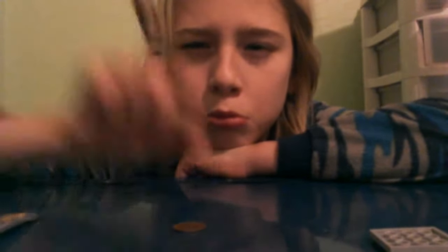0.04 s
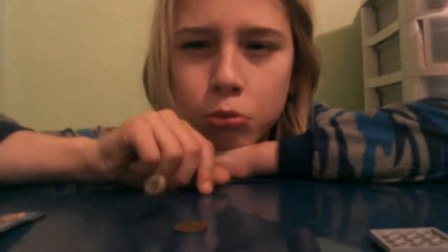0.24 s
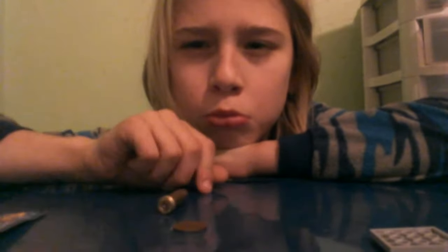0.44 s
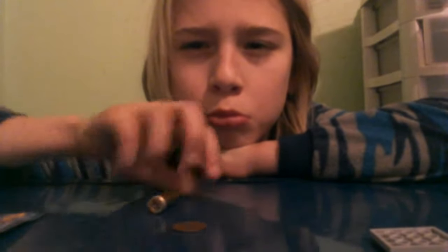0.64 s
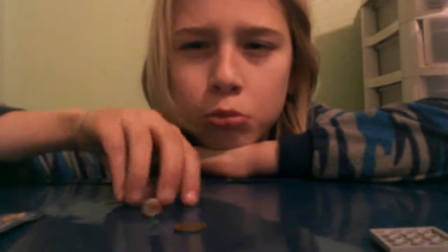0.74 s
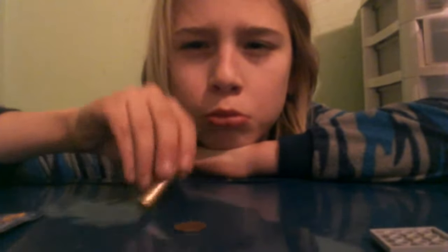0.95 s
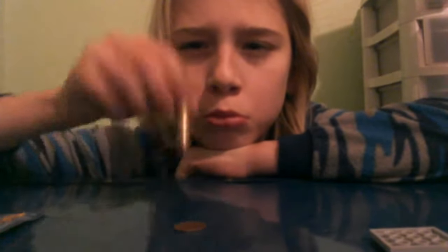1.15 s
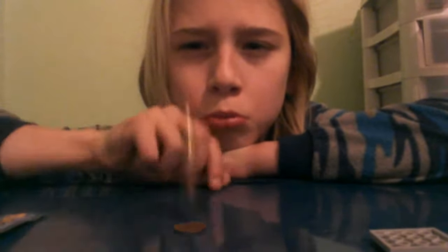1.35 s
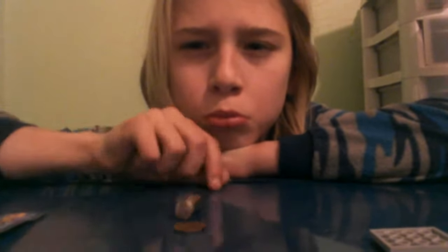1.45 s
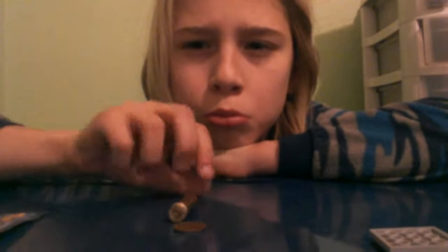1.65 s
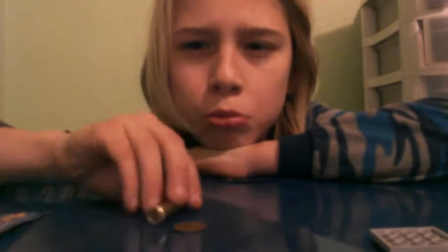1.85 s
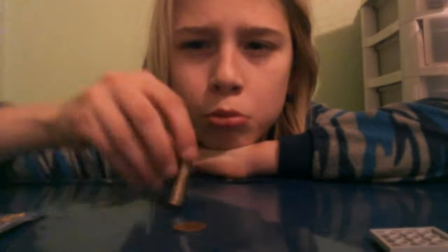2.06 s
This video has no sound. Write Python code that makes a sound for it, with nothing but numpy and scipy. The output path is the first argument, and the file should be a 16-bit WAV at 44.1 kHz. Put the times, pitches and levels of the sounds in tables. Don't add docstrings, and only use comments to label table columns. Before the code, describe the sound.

Light finger ticks and a hollow pop, then loud metal clacks with a table thump; quiet scraping and fumbling follow, then a second clattering landing and faint handling, close up in a small room with hiss.

```python
import sys
import numpy as np
from scipy import signal
from scipy.fft import rfft, irfft, next_fast_len
from scipy.io import wavfile
from scipy.ndimage import uniform_filter1d, map_coordinates

SR = 44100
rng = np.random.default_rng(int(sys.argv[2]) if len(sys.argv) > 2 else 0)


def inscribe(sig):
    pcm = np.round(np.clip(np.atleast_2d(sig).T, -1, 1) * 32767)
    wavfile.write(sys.argv[1], SR, pcm.astype(np.int16))


def gain_from_decibels(decibels):
    exponent = np.asarray(decibels, float) / 20
    return 10 ** exponent


N = 92610
T = np.arange(SR // 4) / SR

# start in seconds, crack in dB, table boom in dB, treble in dB, left-right in dB.
BOUNCES = [(0.2695, 4, -3, 1, -4.5), (0.2791, -5, -31, -1.5, 10), (0.2886, -5, -35.5, 3.5, 6),
           (0.315, -21.5, -35.5, 1, -1), (0.3868, -2, -12.5, 6, 6), (0.4021, -14.5, -30, 2.5, 8),
           (.426, -29, -24.5, 1.5, -11), (.448, -41, -28, -6, -1), (.472, -58.5, -33, -8, 3),
           (1.4686, 3, -7.5, 0, 13), (1.4786, -10, -28.5, -13.5, 3.5), (1.5063, -25, -36, -7.5, 10),
           (1.5564, -5.5, -10.5, -6.5, -1.5), (1.568, -22.5, -27, -10, 4.5)]
# frequency in Hz, density in dB per Hz.
CRACK = [(180, -42), (500, -16.5), (1370, 3), (2030, 3), (3390, -5.5), (4300, -6.5), (6560, -31.5),
         (12300, -26), (15500, -40.5)]
# frequency in Hz, level in dB, t60 in seconds.
TABLE_MODES = [(75.6, -25, 0.12), (101.85, -16.5, 0.14), (229.5, -10, .16), (394.1, 2.5, 0.083),
               (603.5, -10.5, .1), (699, -9.5, 0.1), (921, -10, 0.08), (1146, -15, 0.074),
               (1480, -9.5, .08), (1700, -15, 0.1), (1726, -11.5, 0.11), (2120, -5, .04),
               (2600, -20, 0.074), (3056, -8, 0.094)]


def bounces(track):
    crack_t60_s, treble_hz = 0.018, 5200
    for s, crack_db, boom_db, treble_db, pan_db in BOUNCES:
        spectrum = [(hz, db + treble_db * (hz > treble_hz)) for hz, db in CRACK]
        crack = gain_from_decibels(crack_db) * burst(spectrum, crack_t60_s)
        add_blow(track, s, crack, gain_from_decibels(boom_db) * ring(TABLE_MODES), pan_db)


# start in seconds, level in dB, pitch in Hz,
# t60 in seconds, left-right in dB.
CLACKS = [(0.1246, -28, 1480, .03, 7), (0.2067, -16.5, 1800, 0.022, -12.5), (.2694, -6.5, 1927, 0.027, 3),
          (0.271, -4, 960, 0.07, 2), (0.2695, -10.5, 4000, .015, 2.5), (0.3879, -12.5, 1643, 0.026, 6.5),
          (0.3864, -7.5, 905, 0.035, 2.5), (.389, -10, 579.3, 0.052, 3.5), (1.3264, -28.5, 1534, .04, 5),
          (1.3573, -23, 3850, 0.023, 5), (1.36, -20.5, 234.5, .13, 0.5), (1.4249, -24.5, 718, 0.026, 0),
          (1.4679, -6.5, 3265, 0.024, 8), (1.4689, -7.5, 1812, 0.027, 7.5), (1.5559, -3, 2120, 0.021, -2.5),
          (1.5567, -9.5, 4182, .018, -2.5), (1.5958, -5.5, 915, 0.01, -1),
          (1.5957, -15.5, 1380, 0.0085, -5), (1.5, -61, 14350, .3, 1)]


def clacks(track):
    for s, db, hz, t60_s, pan_db in CLACKS:
        place(track, s, panned(ring([(hz, db, t60_s)], attack_s=0.00015), pan_db))


# frequency in Hz, level in dB, t60 in seconds.
BRASS_MODES = [(12200, -14, .3), (12255, -7, .35), (12330, -14, .3), (14290, -1, .11), (14350, -6, .1)]


def brass_ring(track):
    start_s, level_db, free_s = .2697, -29.5, .115
    place(track, start_s, gain_from_decibels(level_db) * ring(BRASS_MODES) * (T < free_s))


# start in seconds, level in dB, pitch in Hz, crack in dB, t60 in seconds.
POPS = [
    (.2072, -11, 738, -2, .035),
    (1.4245, -36, 700, -25, .02),
    (1.5947, -18, 820, 2, .011),
]
POP_PANS_DB = [-16, -1.5, 2.5]
# ratio to pitch, level in dB, ratio to t60.
MOUTH = [(.56, -3, 1.1), (1, -3, .5), (1, -16, 2.2), (1.25, -4, .45), (2.2, -14, 1.1), (3.9, -9, .5),
         (4.5, -11, .35)]


def pops(track):
    for (s, db, hz, crack_db, t60_s), pan_db in zip(POPS, POP_PANS_DB):
        hollow = ring([(ratio * hz, part_db, decay * t60_s) for ratio, part_db, decay in MOUTH])
        pop = hollow + gain_from_decibels(crack_db - 11.5) * burst(CRACK, .015)
        add_blow(track, s, gain_from_decibels(db) * pop, 0 * T, pan_db, wet_db=-17)


# start in seconds, crack in dB, table boom in dB, left-right in dB, tick pitch in Hz.
FINGERS = [(0.1246, -23.5, -37.5, 6.5, 1500), (.1315, -38, -50.5, 12, 1700), (0.2612, -36, -41.5, 4, 2100),
           (.154, -14.5, -21.5, -0.5, 1900), (0.159, -23.5, -13.5, 1.5, 1640), (.662, -49, -30.5, 10, 3000),
           (0.684, -46, -31.5, -5, 885), (0.713, -47, -31.5, -11, 900), (0.846, -46, -32, 3, 910),
           (1.009, -57.5, -89, 13.5, 3100), (1.032, -50, -50, 5.5, 1820), (1.327, -28, -32.5, 5.5, 1650),
           (1.3574, -15.5, -21, 5, 4140), (1.367, -26, -19.5, -7, 1840), (1.805, -37, -43, 1.5, 2300),
           (1.853, -37.5, -29, -6, 800), (2.0602, -32, -32.5, 7, 3890), (2.07, -37, -30.5, 9, 600)]
# frequency in Hz, density in dB per Hz.
SOFT = [(180, -25.5), (300, 5.5), (952, -12), (1560, -8), (3800, -17), (5470, -30), (14000, -41),
        (15500, -58.5)]
# frequency in Hz, level in dB, t60 in seconds.
PADS = [(75, -13, .1), (140, -2, .06), (232, -1, .08), (390, -4, .04)]


def fingers(track):
    soft_t60_s, tick_db, tick_t60_s = .055, -4, .02
    for s, crack_db, boom_db, pan_db, hz in FINGERS:
        tick = burst(SOFT, soft_t60_s, snap_db=-6.5) + ring([(hz, tick_db, tick_t60_s)])
        thud = gain_from_decibels(boom_db) * ring(PADS, attack_s=0.0066)
        add_blow(track, s, gain_from_decibels(crack_db - 5) * tick, thud, pan_db)


def blows():
    track = np.zeros((2, N + SR))
    for source in (bounces, clacks, brass_ring, fingers, pops):
        source(track)
    return lagged(track[:, :N], .0001)


# time in seconds, level in dB.
DRAGS = [
    [(.42, -49.5), (.445, -33.5), (.47, -55), (.53, -70)],
    [(.65, -88), (.75, -55.5), (.81, -45.5), (.835, -56.5), (.92, -69)],
    [(.97, -53.5), (1.0, -55.5), (1.01, -40.5), (1.025, -49), (1.036, -40.5), (1.06, -44), (1.095, -43.5),
     (1.12, -48.5), (1.16, -70.5)],
    [(1.6, -58), (1.625, -42.5), (1.66, -54.5), (1.72, -63)],
    [(1.8, -73), (1.87, -49.5), (1.93, -58), (1.97, -54), (2.0, -88.5), (2.1, -49.5)],
]
# frequency in Hz, density in dB per Hz.
SCRAPE = [(180, -42), (300, -7), (452, -3.5), (801, -9.5), (1330, -1.5), (3790, 1), (6300, -12),
          (7300, -5.5), (15000, -26)]


def drags():
    grains_per_s, grain_spread_db = 4000, 2.5
    slips_per_s, slip_spread_db, slip_db = 400, 2.5, -6
    hits = rng.random((3, N)) < grains_per_s / SR
    sizes = gain_from_decibels(grain_spread_db * rng.exponential(size=(3, N)))
    grains = hits * sizes * rng.standard_normal((3, N))
    scrape = pair(colour(grains, SCRAPE), 0.9)
    slips = np.zeros(N)
    for hz in (1325, 1900, 3000, 4196, 5060):
        hits = rng.random(N) < slips_per_s / 5 / SR
        kicks = hits * gain_from_decibels(slip_spread_db * rng.exponential(size=N))
        slips += signal.fftconvolve(kicks, ring([(hz, 0, .025)]))[:N]
    strokes = sum(level(d) for d in DRAGS)
    return strokes * lumps(1.5, 200, 80) * (scrape + gain_from_decibels(slip_db) * unit(slips))


# time in seconds, level in dB.
LEAN = [(0.0, -52), (0.1, -59), (0.17, -23), (0.24, -48.5), (0.27, -22.5), (0.36, -46), (0.4, -33),
        (0.54, -51.5), (0.62, -61), (0.67, -44.5), (1.2, -57.5), (1.31, -59.5), (1.36, -50.5),
        (1.44, -63.5), (1.47, -16.5), (1.8, -63), (1.86, -40.5), (1.97, -55), (2.1, -50)]
# frequency in Hz, density in dB per Hz.
RUMBLE = [(25, -32), (55, -13.5), (120, 0), (180, -8), (232, 1), (290, -14.5), (400, -12), (800, -18),
          (1500, -65)]


def lean():
    pressure = np.minimum(level(LEAN), gain_from_decibels(-35.0))
    rumble = pair(colour(rng.standard_normal((3, N)), RUMBLE), 0.45)
    return pressure * lumps(2.5, 100, 25) * rumble


# frequency in Hz, t60 in seconds.
ROOM_T60 = [(200, 0.26), (700, 0.25), (2000, 0.21), (5000, 0.2), (9000, 0.18), (11500, .15), (13500, .06)]
# frequency in Hz, level in dB.
ROOM_TONE = [(150, -12.5), (330, -5.5), (420, -1), (1000, -4), (2000, 0.5), (4300, -5), (5500, -21.5),
             (10500, -26.5), (12000, -44.5)]


def room(energy, boom):
    patchy_db, boom_wet_db, onset_s = 2.2, -17.5, 0.0034
    hz, t, z = signal.stft(rng.standard_normal((3, SR // 4)), SR, nperseg=256)
    patches = uniform_filter1d(rng.standard_normal(z.shape[1:]), size=9, axis=0)
    z = z * gain_from_decibels(patchy_db * unit(patches))
    z = z * gain_from_decibels(along(ROOM_TONE, hz)[:, None] - 60 * t / along(ROOM_T60, hz)[:, None])
    tail = pair(signal.istft(z, SR, nperseg=256)[1], 0.12)[:, :len(T)]
    tail = tail * (1 - np.exp(-(T / onset_s) ** 2))
    tail = tail / np.linalg.norm(tail[0])
    boom_tail = signal.fftconvolve(boom[None], tail, axes=1)[:, :len(T)]
    return energy * tail + gain_from_decibels(boom_wet_db) * boom_tail


def add_blow(track, s, crack, boom, pan_db, wet_db=0):
    wet = gain_from_decibels(-7.5 + wet_db) * room(np.linalg.norm(crack[0]), boom)
    place(track, s, panned(crack, pan_db) + boom + wet)


def place(track, s, x):
    track[:, round(s * SR):][:, :len(T)] += x


def panned(x, pan_db):
    return x * gain_from_decibels([[pan_db / 2], [-pan_db / 2]])


def burst(spectrum, t60_s, snap_db=5):
    snap_t60_s, touch_s = .008, .00015
    fade = gain_from_decibels(-60 * T / t60_s) + gain_from_decibels(snap_db - 60 * T / snap_t60_s)
    fade = fade * (1 - np.exp(-T / touch_s))
    return pair(colour(rng.standard_normal((3, len(T))), spectrum), 0.52) * fade


def ring(modes, attack_s=0.00066):
    strike_spread_db = 1.5
    total = np.zeros(len(T))
    for hz, db, t60_s in modes:
        struck_db = db + rng.normal(0, strike_spread_db)
        total += gain_from_decibels(struck_db - 60 * T / t60_s) * np.sin(2 * np.pi * hz * T)
    return total * (1 - np.exp(-T / attack_s))


def lumps(spread_db, count, per_s):
    return gain_from_decibels(spread_db * map_coordinates(rng.standard_normal(count), [np.arange(N) * per_s / SR]))


def unit(x):
    return x / np.sqrt(np.mean(x ** 2) + 1e-20)


def along(points, hz):
    f, v = np.transpose(points)
    return np.interp(np.log(hz + 1), np.log(f + 1), v)


def level(rows):
    s, db = np.transpose(rows)
    return gain_from_decibels(np.interp(np.arange(N) / SR, s, db, left=-120, right=-120))


def shaped(x, response):
    m = next_fast_len(x.shape[-1] + 4096)
    return irfft(rfft(x, m) * response(np.fft.rfftfreq(m, 1 / SR)), m)[..., :x.shape[-1]]


def colour(x, spectrum):
    return unit(shaped(x, lambda hz: gain_from_decibels(along(spectrum, hz))))


def pair(x, alike):
    mono_hz = 487
    share = lambda hz: alike + (1 - alike) / (1 + (hz / mono_hz) ** 2)
    common = shaped(x[0], lambda hz: np.sqrt(share(hz)))
    return common + shaped(x[1:], lambda hz: np.sqrt(1 - share(hz)))


def lagged(x, lag_s):
    return shaped(x, lambda hz: np.exp(np.outer([-1, 1], 1j * np.pi * hz * lag_s)))


def causal(gain):
    cep = irfft(np.log(gain))
    half = cep.shape[-1] // 2
    fold = np.r_[1, 2 * np.ones(half - 1), 1, np.zeros(cep.shape[-1] - half - 1)]
    return np.exp(rfft(cep * fold))


# frequency in Hz, level in dB.
PORTS = [(250, -5), (500, -3), (1400, -4.5), (3000, 6), (6000, 3.5), (12000, -11.5)]


def ports(near):
    return shaped(near, lambda hz: causal(gain_from_decibels(np.outer([.5, -.5], along(PORTS, hz)))))


def scene():
    near = blows() + lagged(drags(), -0.000097)
    return ports(near) + lean()


# frequency in Hz, density in dB per Hz.
HISS = [(240, -33.5), (400, -11.5), (1020, -5), (1190, -6.5), (1800, -10.5), (1910, -5), (2150, -10.5),
        (15000, -17.5)]


def self_noise():
    return gain_from_decibels(-59.5) * pair(colour(rng.standard_normal((3, N)), HISS), 0.063)


def overload(x):
    ceiling, knee = .99, 14
    return x / (1 + np.abs(x / ceiling) ** knee) ** (1 / knee)


def band_limit(x):
    return signal.sosfilt(signal.butter(12, 15610, fs=SR, output="sos"), x)


def record(dry):
    low_hz, top_hz = 60, 14700
    x = dry + self_noise()
    x = signal.sosfilt(signal.butter(2, low_hz, "high", fs=SR, output="sos"), x)
    x = signal.sosfilt(signal.ellip(8, 1, 50, top_hz, fs=SR, output="sos"), x)
    return band_limit(overload(x))


dry = scene()
out = record(dry)
inscribe(out)
```